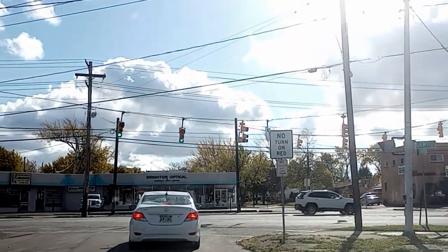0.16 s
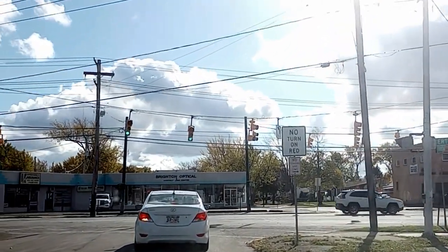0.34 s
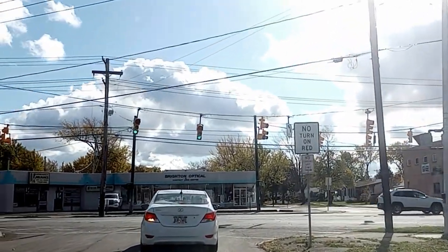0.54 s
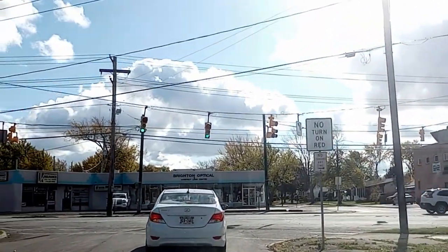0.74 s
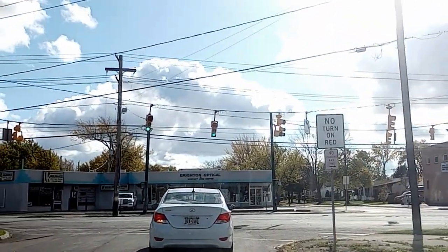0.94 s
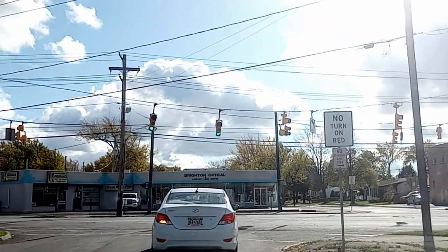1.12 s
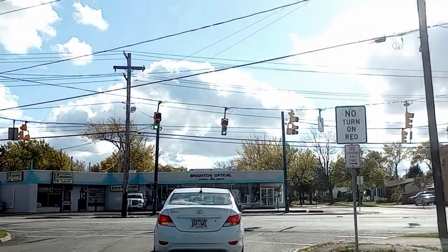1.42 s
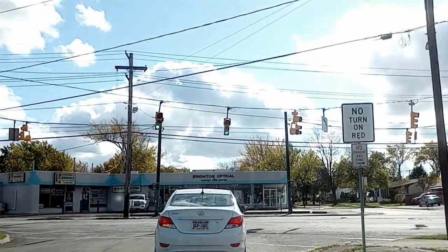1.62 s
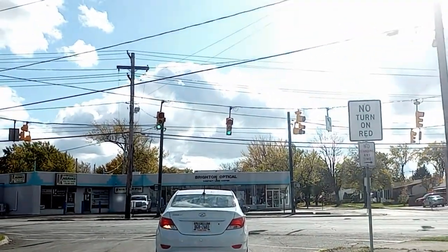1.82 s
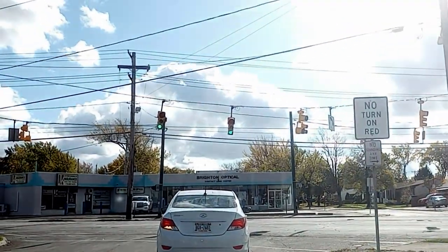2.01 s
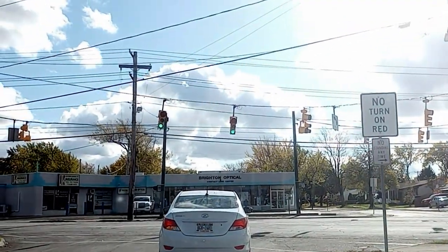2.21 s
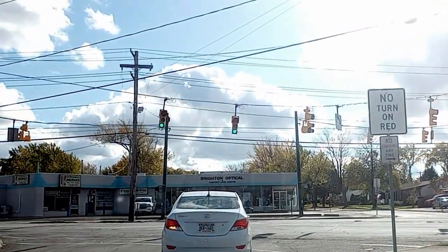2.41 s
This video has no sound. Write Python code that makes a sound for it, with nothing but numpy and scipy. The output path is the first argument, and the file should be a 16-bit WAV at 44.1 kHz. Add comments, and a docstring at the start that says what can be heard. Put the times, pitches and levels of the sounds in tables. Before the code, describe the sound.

Truck engine idles with a low uneven rumble inside the cab, with creaks, a snap and thuds

```python
"""Inside the cab of a truck creeping at idle: uneven firings and road shake boom in the cabin's low modes.
Filtered noise gives a steady air hiss and a sleeve rustling, mostly on the right; low knocks are sagging tones.
Trim and dashboard tick and creak: bursts of noise ring resonances. Something snaps and then thuds.
A small stereo camera hears it; its housing rings near 6 and 15 kHz."""
import sys
import numpy as np
from scipy import signal
from scipy.fft import rfft, irfft, next_fast_len
from scipy.io import wavfile
from scipy.ndimage import uniform_filter1d

SR = 44100
rng = np.random.default_rng(int(sys.argv[2]) if len(sys.argv) > 2 else 0)


def put_to_file(sound):
    """Save the sound as 16-bit audio at rate SR, in the file named by the first command-line argument."""
    columns = np.atleast_2d(sound).T  # one column per channel
    safe = np.clip(columns, -1, 1)
    whole_steps = np.round(safe * 32767)
    wavfile.write(sys.argv[1], SR, whole_steps.astype(np.int16))


def how_loud(loudness_db):
    """Turn decibels into a plain amplitude multiplier (0 dB gives 1, 20 dB gives 10)."""
    steps = np.asarray(loudness_db, float) / 20
    return 10 ** steps


N = 112454  # length in samples


def colour(x, points):
    """Filter through (f/Hz, gain/dB) points; it is minimum-phase, so nothing sounds ahead of its cause."""
    n = next_fast_len(x.shape[-1] + 8192)
    size = 2 ** 14
    hz, db = np.transpose(points)
    f = np.arange(size // 2 + 1) * SR / size
    log_gain = np.interp(np.log(f + 1), np.log(hz), db) * np.log(10) / 20
    # folding the cepstrum (the transform of the log gain) gives the minimum phase
    cepstrum = irfft(log_gain)
    cepstrum[1:size // 2] *= 2
    cepstrum[size // 2 + 1:] = 0
    response = irfft(np.exp(rfft(cepstrum)))[:size // 2]
    return irfft(rfft(x, n) * rfft(response, n), n)[..., :x.shape[-1]]


def unit(x):
    """Scale to rms 1."""
    return x / np.sqrt(np.mean(x ** 2))


def walk(rate):
    """Smooth random curve of rms 1, made from `rate` random values per second."""
    k = int(SR / rate)
    steps = np.repeat(rng.standard_normal(N // k + 1), k)
    smooth = uniform_filter1d(uniform_filter1d(steps, k), k)
    return unit(smooth[:N])


def curve(rows, order):
    """Column number `order` of a time table, drawn as straight lines over every sample."""
    r = np.array(rows, float)
    return np.interp(np.arange(N) / SR, r[:, 0], r[:, order])


def pan(db):
    """Left and right gains that differ by db; positive leans left."""
    return how_loud(np.array([db / 2, -db / 2]))


def spread(mid, side):
    """Make two ears from a shared and an opposed signal, mixed by how alike the ears are at each pitch."""
    # how alike left and right are: f/Hz, likeness (1 same, 0 unrelated, -1 opposite)
    likeness = [(60, 0.91), (130, 0.92), (290, 0.87), (640, 0.27), (1410, -0.38), (3100, 0.44),
                (6820, -0.13), (15000, 0.11)]
    hz, alike = np.transpose(likeness)
    f = np.arange(N // 2 + 1) * SR / N + 1
    c = np.clip(np.interp(np.log(f), np.log(hz), alike), -.99, .99)
    m = irfft(rfft(mid) * np.sqrt((1 + c) / 2), N)
    s = irfft(rfft(side) * np.sqrt((1 - c) / 2), N)
    return np.array([m + s, m - s])


def boom():
    """Uneven engine firings plus random road shake excite the cabin's low modes."""
    # colour of the cabin boom: f/Hz, relative level/dB
    boom_colour = [(15, -50), (25, -31.5), (47, -13), (64, -7.5), (84, -3.5), (98, -0.5), (145, -10),
                   (188, -8.5), (211, -10.5), (241, -19.5), (251, -15), (265, -73), (300, -64),
                   (390, -49.5), (660, -120)]
    # loudness of the boom over time: t/s, level/dB
    boom_level = [(0, -34), (.7, -36.5), (.85, -33), (1.25, -34.5), (1.5, -38), (1.75, -35), (1.85, -34),
                  (2.05, -36.5), (2.25, -37.5), (2.4, -30.5), (2.55, -37)]
    firing_hz, firing_jitter = 26.78, .25  # mean rate, spread of each gap as a share of the mean gap
    firing_scatter_db, shake_db = 4, 1.5   # spread of firing strength, shake relative to firings
    chance = rng.standard_normal((200, 2))
    gaps = np.clip(1 + firing_jitter * chance[:, 0], .3, 3) * SR / firing_hz
    at = np.cumsum(gaps).astype(int)
    pulses = np.zeros(N)
    pulses[at[at < N]] = how_loud(firing_scatter_db * chance[at < N, 1])
    shake = rng.standard_normal((2, N))
    drive = unit(unit(pulses) + how_loud(shake_db) * shake[0])
    sound = unit(colour(spread(drive, shake[1]), boom_colour))
    return sound * how_loud(curve(boom_level, order=1)) * pan(-0.5)[:, None]


def hiss():
    """Air and fan hiss: steady coloured noise whose level flickers a little."""
    # colour of the hiss: f/Hz, relative level/dB
    hiss_colour = [(150, -16.5), (260, -7), (299, -21.5), (362, -18), (549, -24), (588, -34), (750, -23.5),
                   (924, -9), (1010, -17.5), (1850, -20.5), (2090, -26.5), (2570, -32), (2960, -49.5),
                   (3230, -37), (4640, -33.5), (5240, -38), (5820, -41), (6460, -33), (10900, -39),
                   (13900, -37), (14900, -13.5), (15700, -17), (16500, -48.5)]
    noise = spread(*rng.standard_normal((2, N)))
    level_db = -52.5 + 0.27 * walk(5.44)
    return unit(colour(noise, hiss_colour)) * how_loud(level_db) * pan(-0.46)[:, None]


def cab(x, t60, echo_db):
    """Short dense echo of the cabin: fading noise, t60 seconds per 60 dB, echo_db relative to the direct sound."""
    t = np.arange(8192) / SR
    echo = rng.standard_normal((2, 8192)) * how_loud(-60 * t / t60) * (t > .003)
    echo = echo / np.sqrt(np.sum(echo ** 2, axis=1, keepdims=True))
    return x + how_loud(echo_db) * signal.fftconvolve(x, echo, axes=1)[:, :N]


def rustle():
    """Sleeve cloth drags in dense tiny catches of random strength; its top band swells on its own."""
    # colour of the cloth noise: f/Hz, relative level/dB
    cloth_colour = [(1880, -37.5), (3200, -27.5), (3830, -23), (5580, -2.5), (6100, -9), (7190, -15),
                    (7920, -24), (9400, -31.5), (12000, -28.5), (13500, -33.5), (14400, -56.5),
                    (14800, -8.5), (15600, 0), (16100, -27), (16500, -78)]
    # the sleeve's movement: t/s, gain/dB, extra gain of the top band/dB, left minus right/dB
    rub = [(0, -64.5, -3, -2), (.42, -65, 9.5, 0.5), (.5, -55.5, 1, 1.5), (.68, -54, -2, -2),
           (.8, -62, 2, -0.5), (.94, -64, 10, -6), (.98, -55.5, 8, -2), (1.07, -52, -1, -4),
           (1.19, -51, -4, -4), (1.26, -52.5, 5, -2.5), (1.35, -44.5, 3, -4.5), (1.46, -65, 7, -1.5),
           (1.72, -65.5, 4, -6), (1.76, -51.5, -4, -3.5), (1.81, -55, 12, -5), (1.93, -54, -12, 0.5),
           (2.04, -50, 2, -10.5), (2.12, -45.5, -1, -6.5), (2.17, -53.5, -1, -10.5), (2.24, -60, 0, -9),
           (2.3, -45.5, -7, -6), (2.4, -64.5, -15, 4), (2.47, -61, -15, -3), (2.55, -50.5, -20, 3)]
    catch_db = 2.9 * rng.exponential(size=N) + 1.56 * walk(90)
    cloth = unit(colour(rng.standard_normal((2, N)) * how_loud(catch_db), cloth_colour))
    top = signal.sosfilt(signal.butter(4, 9000, "high", fs=SR, output="sos"), cloth)
    body = (cloth - top) * how_loud(1.47 * walk(13))
    top = top * how_loud(curve(rub, order=2) + 3.2 * walk(41.4))
    return (body + top) * how_loud(curve(rub, order=1)) * pan(curve(rub, order=3))


def thuds():
    """Low knocks in the cabin: each is a tone that sags in pitch, holds briefly and dies."""
    # knocks: t/s, level before panning/dB, starting f/Hz, hold/s, time to fade by 60 dB/s
    knocks = [(.15, -27.5, 81.6, 0.032, 0.058), (.375, -32, 108.2, 0.045, 0.36),
              (.52, -23.5, 103, 0.017, 0.039), (.77, -29, 99, 0.012, 0.08), (1.26, -34, 171, 0.016, 0.056),
              (1.635, -24, 185.4, 0.008, 0.078), (1.648, -23, 98.2, 0.019, 0.32),
              (1.949, -17.5, 194.7, 0.032, 0.019), (1.978, -14, 143, 0.011, 0.048),
              (1.95, -34.5, 360, 0.012, 0.025), (2.12, -27, 108.4, 0.021, 0.14),
              (1.63, -33, 484.4, 0.016, 0.14), (1.629, -47, 287, 0.018, 0.3), (1.95, -39, 482, 0.0061, .12),
              (1.952, -31.5, 257, 0.018, 0.095), (2.005, -29.5, 176.6, 0.0081, 0.17)]
    attack_s, sag_per_s = 0.0017, 4.6  # sag: rate of the pitch fall up to 150 Hz, slower above
    out = 0
    for s, db, hz, hold, t60 in knocks:
        t = np.clip(np.arange(N) / SR - s, 0, 1)
        sag = sag_per_s * min(150 / hz, 1) ** 2
        fade_db = -60 * np.clip(t - hold, 0, 1) / t60
        env = (1 - np.exp(-t / attack_s)) * how_loud(db + fade_db)
        cycles = hz * (1 - np.exp(-sag * t)) / sag
        out = out + env * np.sin(2 * np.pi * cycles)
    late_left = np.roll(out, int(SR * 0.00039))  # the left ear hears it slightly later
    return np.array([late_left, out]) * pan(-3.4)[:, None]


def ring(x, group):
    """Sum of resonances, each applied twice; white noise keeps its rms."""
    f = np.arange(N // 2 + 1) * SR / N + 1e-3
    h = 0
    for k, (hz, width, db) in enumerate(group):
        # neighbours alternate in sign; half the dB here, as squaring doubles it
        h = h + (-1) ** k * how_loud(db / 2) / (1 + 1j * (f - hz * hz / f) / width)
    h = h ** 2
    return irfft(rfft(x) * h / np.sqrt(np.mean(np.abs(h) ** 2)), N)


def ticks():
    """Each tick is a short crackle of catches, unlike in the two ears, that rings five groups of resonances."""
    # resonances of panel, trim, trim clip, shell and housing: f/Hz, width of one pass/Hz, relative level/dB
    panel = [(528, 600, -12), (830, 106, 6), (948, 200, 2), (1255, 67, -1.5)]
    trim = [(1295, 117, -3), (1494, 144, 1), (1690, 99, 5), (1929, 150, 4)]
    trim_clip = [(2450, 300, -5.5), (3167, 283, -0.5), (3500, 71, 1), (3700, 175, 3.5), (3840, 360, 3.5),
                 (4290, 220, 2.5)]
    shell = [(5075, 67, -19), (5100, 470, -3), (5797, 435, 1), (6260, 347, -1), (6870, 580, -7.5),
             (10000, 8300, -28.5)]
    housing = [(15220, 1300, 0.5)]
    # ticks: t/s, drive of panel/dB, trim/dB, trim clip/dB, shell/dB, housing/dB,
    # time to fade by 60 dB/s, left minus right/dB
    tick_rows = [(0.204, -32.5, -38, -57, -38, -39, 0.032, -11),
                 (0.246, -37, -46.5, -69, -62, -61, 0.042, -11), (.839, -70, -70, -59, -62, -58, 0.043, -3),
                 (1.545, -66, -65, -75, -34, -26.5, 0.038, -11.5),
                 (1.575, -65, -55.5, -59, -39, -46, 0.066, -6),
                 (1.623, -29.5, -27, -30.5, -18, -27, 0.045, -12),
                 (1.6275, -30.5, -22.5, -29.5, -13, -25, 0.022, -7),
                 (1.632, -28.5, -21.5, -26, -24, -34, 0.028, 3.5),
                 (1.64, -32, -36, -56, -48, -36, 0.036, -4.5),
                 (1.669, -35.5, -36, -29, -30.5, -37, 0.043, -4.5),
                 (1.742, -63, -61, -52, -48, -41.5, 0.057, -5),
                 (1.945, -37, -43.5, -51, -56, -42.5, 0.083, -3.5),
                 (2.05, -67, -54, -37.5, -38, -47, 0.079, -7.5),
                 (2.268, -61, -45, -45.5, -36, -35.5, 0.089, 5.5),
                 (2.309, -66, -57, -70, -55, -66, 0.031, 6), (2.418, -55, -51, -33, -46, -47, 0.041, -4)]
    attack_s, first_catch_db = 0.0004, 14
    t = np.arange(8192) / SR
    drive = np.zeros((5, 2, N + 9000))  # group, ear, sample
    for s, *group_db, t60, pan_db in tick_rows:
        gains = pan(pan_db)
        burst = unit(rng.standard_normal((2, 8192)) * how_loud(3.1 * rng.exponential(size=8192)))
        burst = burst * (1 - np.exp(-t / attack_s)) * how_loud(-60 * t / max(t60, .008)) * gains[:, None]
        # one strong catch near the start, 20 samples in
        burst[:, 20] = how_loud(first_catch_db) * np.sign(burst[:, 20]) * gains
        start = int(s * SR)
        drive[..., start:start + 8192] += how_loud(np.array(group_db))[:, None, None] * burst
    groups = (panel, trim, trim_clip, shell, housing)
    return sum(ring(d[:, :N], group) for d, group in zip(drive, groups))


def scene():
    """All sources in the cab; rustle and ticks also get the cabin's echo."""
    background = boom() + hiss()
    sleeve = cab(rustle(), t60=0.093, echo_db=3.1)
    ticking = cab(ticks(), t60=0.093, echo_db=-9.5)
    return background + sleeve + thuds() + ticking


def low_pass(x):
    """Removes everything above the highest recorded frequency."""
    return signal.sosfilt(signal.butter(12, 17110, fs=SR, output="sos"), x)


def record(dry):
    """The camera's microphone ports colour the top octave."""
    # response of the microphone ports: f/Hz, gain/dB
    ports = [(12500, -0.5), (13800, -4), (14400, -12), (14700, -9), (14950, -2.5), (15250, 3.5),
             (15550, -5.5), (15800, -27), (16500, -24)]
    mix = colour(dry, ports)
    return low_pass(mix)


dry = scene()
out = record(dry)
put_to_file(out)
```